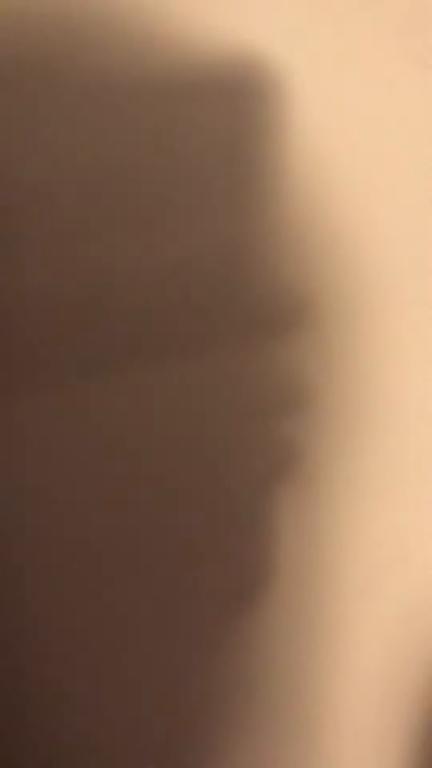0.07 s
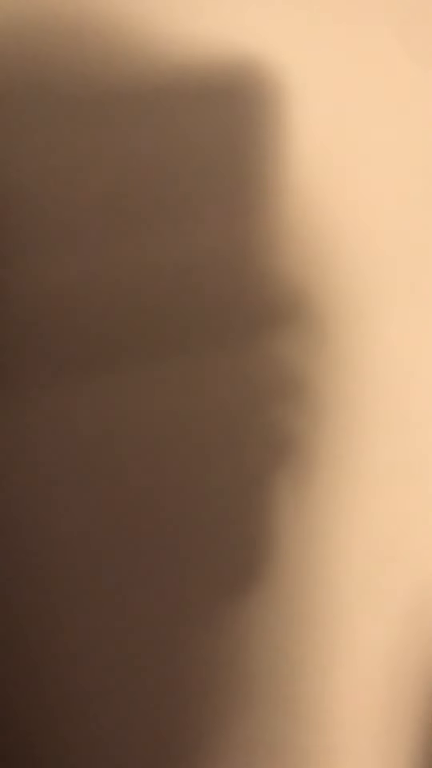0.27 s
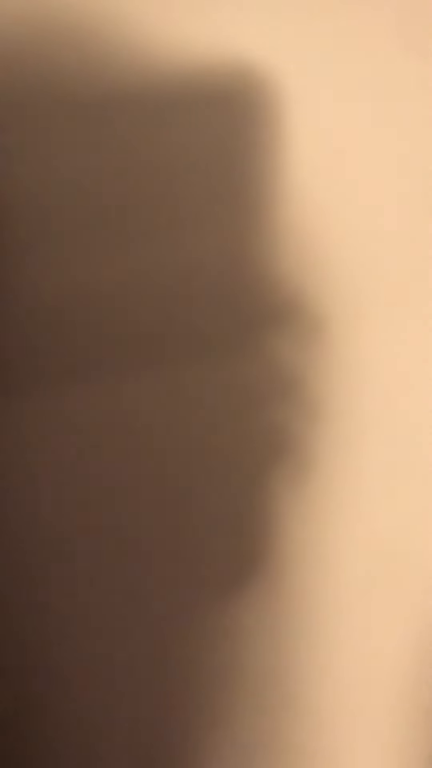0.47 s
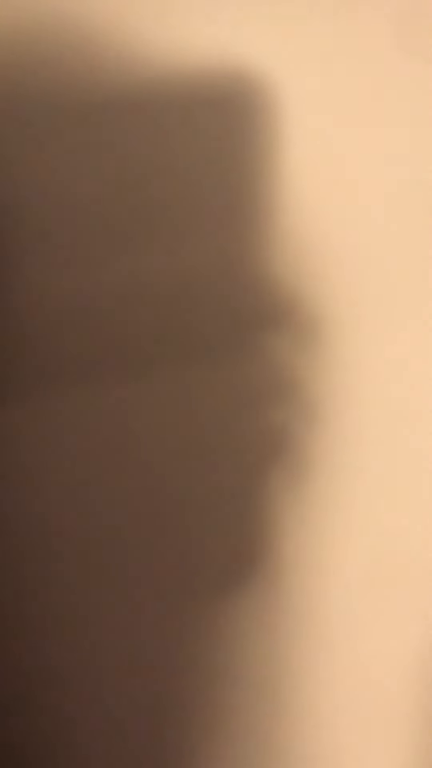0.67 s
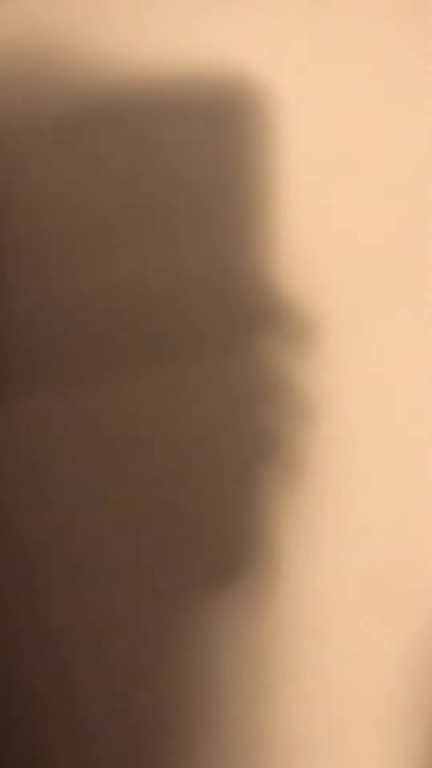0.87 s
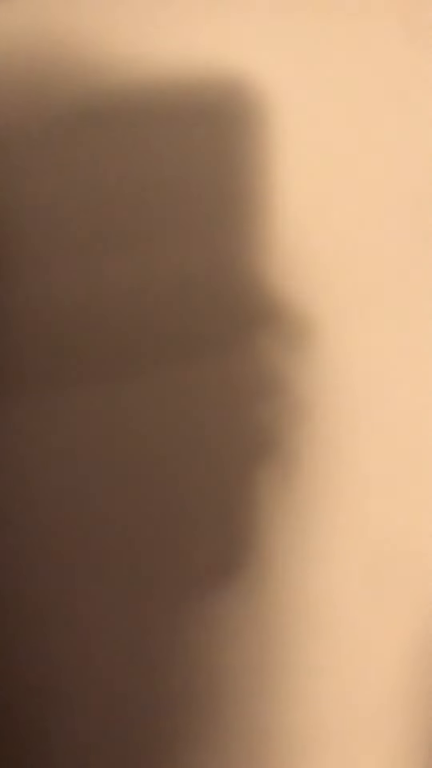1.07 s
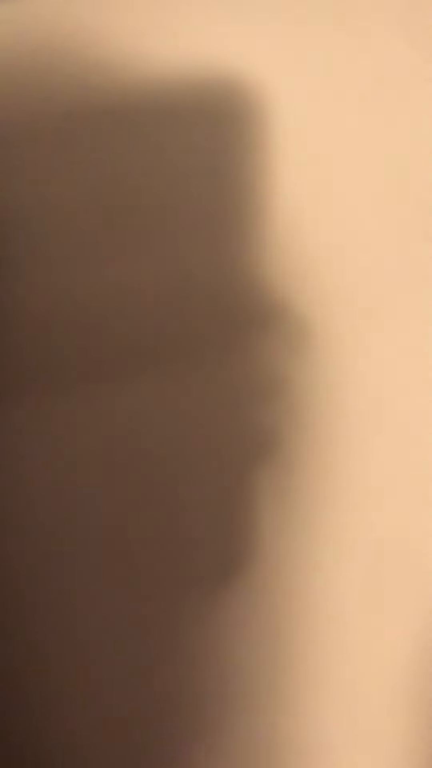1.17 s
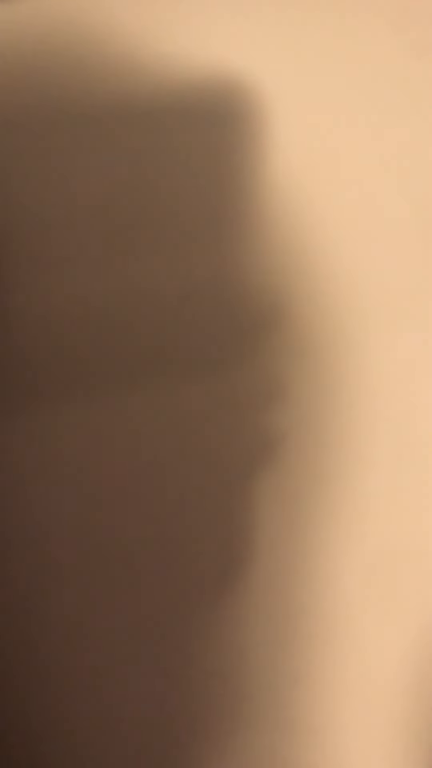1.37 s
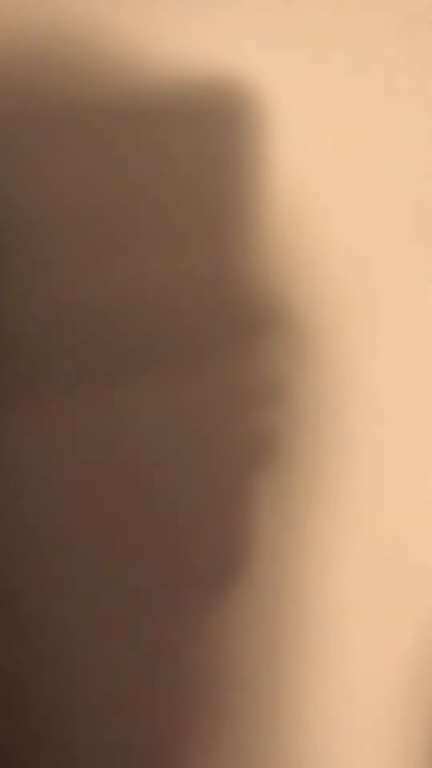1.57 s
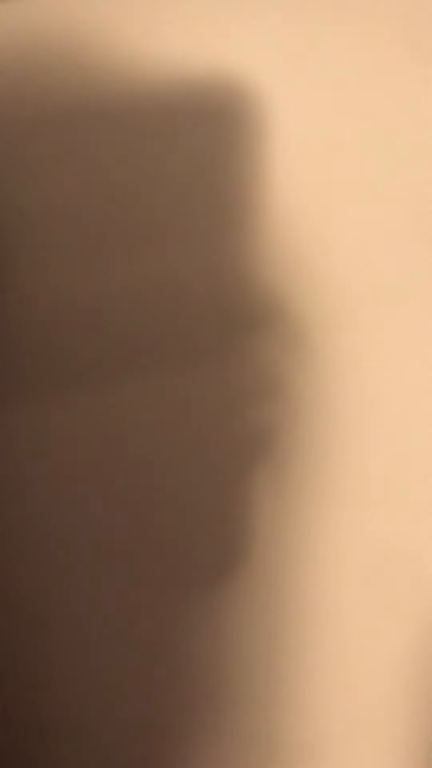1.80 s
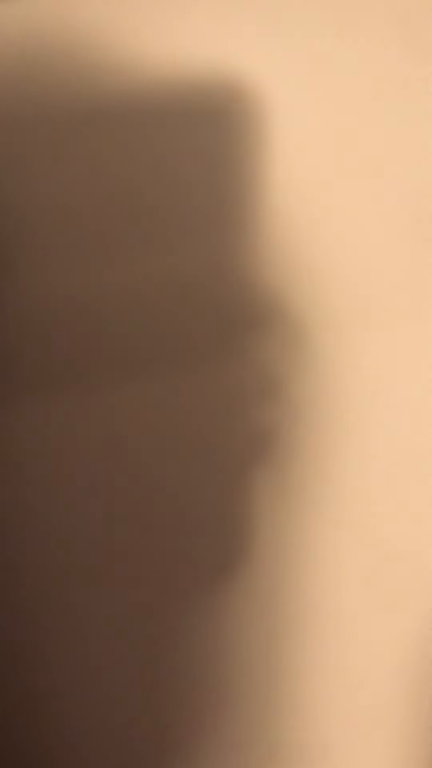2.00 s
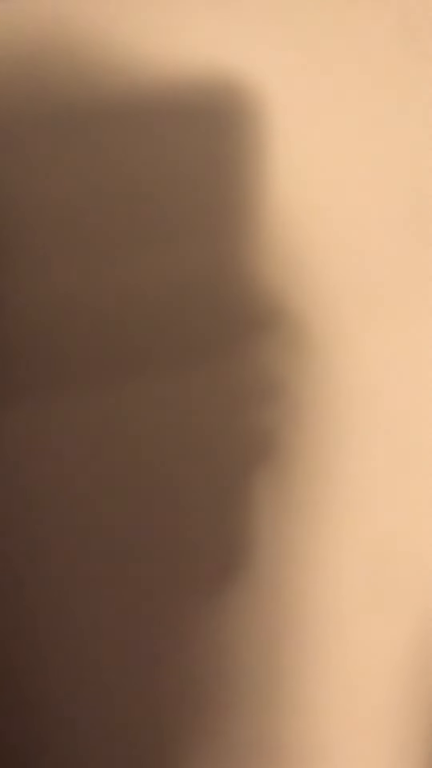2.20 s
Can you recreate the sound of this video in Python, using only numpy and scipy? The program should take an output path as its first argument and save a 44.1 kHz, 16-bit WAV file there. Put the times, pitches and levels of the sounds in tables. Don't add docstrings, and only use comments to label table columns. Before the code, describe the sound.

Small magnets clack sharply at about 0.25 seconds as a stack is set down, and a piece bounces on the table top in lighter taps until 0.5. Near quiet follows, with a faint tick at 1.15 and soft finger rustle. Around 1.53 to 1.6 a very loud, rapid cluster of bright steel snaps and a scrape bursts out, then barely audible ticks, in a quiet room with short echo, low hum and hiss.

```python
import sys
import numpy as np
from scipy import signal
from scipy.fft import rfft, irfft
from scipy.io import wavfile
from scipy.ndimage import uniform_filter1d

SR = 44100
rng = np.random.default_rng(int(sys.argv[2]) if len(sys.argv) > 2 else 0)


def nominal_scale(level):
    x = np.asarray(level, float) / 20
    return 10 ** x


def dump_mix(stems):
    frames = np.atleast_2d(stems).T
    limited = np.clip(frames, -1, 1)
    pcm = np.round(limited * 32767).astype(np.int16)
    wavfile.write(sys.argv[1], SR, pcm)


N = 99048


def level(x, db):
    return x * nominal_scale(db) / np.sqrt(np.mean(x ** 2))


def unit_energy(x):
    return x / np.sqrt(np.sum(x ** 2))


def fade(t, t60):
    return np.exp(-np.log(1000) * t / t60)


def ring(x, hz, t60):
    radius, angle = fade(1 / SR, t60), 2 * np.pi * hz / SR
    return signal.lfilter([0, radius * np.sin(angle)], [1, -2 * radius * np.cos(angle), radius ** 2], x)


def band(x, lo_hz, hi_hz):
    limits = [lo_hz, min(hi_hz, .45 * SR)]
    return signal.sosfilt(signal.butter(2, limits, "bandpass", fs=SR, output="sos"), x)


def even(x):
    spectrum = rfft(x, 2 * len(x))
    return irfft(spectrum / np.abs(spectrum))[:len(x)]


def add(out, start, sound):
    i = int(start * SR)
    out[i:i + len(sound)] += sound[:max(N - i, 0)]


def seconds(length):
    return np.arange(length) / SR


def walk(rate):
    hold = int(SR / rate)
    return uniform_filter1d(np.repeat(rng.standard_normal(N // hold + 1), hold), hold)[:N]


def curve(points):
    return np.interp(seconds(N), *np.array(points).T)


# pitch in Hz, level in dB per Hz.
HISS = [(25, -28), (45, -10.5), (85, -9.5), (200, -14.5), (420, -22), (1140, -28), (5000, -34.5),
        (16000, -39)]
# pitch in Hz, level in dB, t60 in seconds.
HUM = [(59.8, -70, 0.48), (122, -75.5, 0.082)]


def floor():
    hz = np.arange(N // 2 + 1) * SR / N + 1
    table = np.array(HISS)
    tilt_db = np.interp(np.log(hz), np.log(table[:, 0]), table[:, 1])
    hiss = irfft(rfft(rng.standard_normal(N)) * nominal_scale(tilt_db), N)
    hum = sum(level(ring(rng.standard_normal(N), f, t60), db) for f, db, t60 in HUM)
    return level(hiss * nominal_scale(.7 * walk(rate=20)), -68) + hum


# pitch in Hz, t60 in seconds, level in dB.
ECHO = [(150, 0.17, -32.5), (389, 0.25, -27), (921.3, 0.21, -29.5), (2100, 0.29, -39.5), (4030, 0.13, -36),
        (6500, 0.15, -38.5), (12600, 0.048, -36)]


def room(x):
    t = seconds(SR // 2)
    tail = 0
    for hz, t60, db in ECHO:
        tail = tail + nominal_scale(db) * fade(t, t60) * band(rng.standard_normal(len(t)), hz / 1.87, hz * 1.544)
    return signal.fftconvolve(x, tail * np.clip(t / 0.0013, 0, 1))[:N]


# start in seconds, level in dB, pitch in Hz, t60 in seconds.
BOOMS = [(0.079, -48.5, 910, .04), (.243, -28.5, 586, 0.16), (1.172, -41.5, 378, .15),
         (1.29, -54, 590, 0.11), (1.37, -53, 622, 0.14), (1.399, -57, 372, .1), (1.443, -47, 1410, 0.059),
         (1.47, -43, 600, 0.04), (1.545, -29, 357.6, 0.1), (1.565, -28, 584, 0.054), (1.98, -50, 920, 0.07),
         (2.14, -63, 637, .2), (2.226, -47, 700, 0.073)]


def hollow():
    out, t = np.zeros(N), seconds(SR // 3)
    rise = 1 - np.exp(-t / 0.0084)
    for start, db, hz, t60 in BOOMS:
        add(out, start, nominal_scale(db) * fade(t, t60) * rise * np.sin(2 * np.pi * hz * t))
    return out


# time in seconds, level in dB.
BRUSHING = [(0, -87), (.18, -88), (.235, -75), (.3, -94.5), (1.079, -94.5), (1.13, -69.5), (1.199, -86.5),
            (1.27, -76), (1.329, -69.5), (1.39, -74.5), (1.42, -74), (1.47, -67.5), (1.53, -54.5),
            (1.62, -78), (1.901, -87.5), (1.96, -80.5), (2.05, -83.5), (2.246, -69.5)]
# pitch in Hz, width in Hz, level in dB.
BRUSHED_RINGS = [(4200, 180, -3.5), (6200, 2400, -3), (9600, 670, -10.5), (11800, 1400, -8),
                 (14300, 3000, -8.5)]


def rustle():
    out, brush_db = np.zeros(N), curve(BRUSHING)
    for hz, width, db in BRUSHED_RINGS:
        grain = rng.standard_normal(N) * rng.random(N) ** 5
        patchy = nominal_scale(brush_db + 4 * walk(rate=55))
        out += level(band(grain, hz - width / 2, hz + width / 2), db) * patchy
    return out


def body(strong, field, count=260):
    f = np.array(field)
    low, high = np.sqrt(f[0, 0]), np.sqrt(f[-1, 0])
    place = (np.arange(count) + rng.random(count)) / count
    hz = (low + (high - low) * place) ** 2
    db, t60 = [np.interp(np.log(hz), np.log(f[:, 0]), column) for column in f.T[1:]]
    rows = np.vstack([strong, np.array([hz, db, t60]).T])
    t = seconds(SR // 4)
    sines = np.sin(2 * np.pi * rows[:, :1] * t)
    return rows[:, 0], nominal_scale(rows[:, 1:2]) * fade(t, rows[:, 2:]) * sines


def strike(modes, treble_from_hz, treble_db, bass_db):
    hz, sines = modes
    share, side = rng.standard_normal((len(hz), 2)).T
    treble = treble_db / (1 + (treble_from_hz / hz) ** 9)
    bass = bass_db * (hz < 750)
    return (nominal_scale(2.2 * share + treble + bass) * np.sign(side)) @ sines


# pitch in Hz, level in dB, t60 in seconds.
TABLE_MODES = [(75, -5, .08), (137, -11, .18), (270, -8, .1), (595, -3, .07), (688, -5, .06),
               (1087, -6, .05), (1545, -4, .045), (1860, -4, .045), (2572, -2, .04), (2885, -4, .04),
               (3175, -2, .04), (3395, -4, .035), (3960, -3, .025), (4300, -6, .018)]
# pitch in Hz, level in dB, t60 in seconds.
TABLE_LESSER = [(205.2, -16.5, 0.095), (700, -13, 0.095), (1830, -4.5, 0.028), (2950, -4.5, 0.028),
                (4270, -8.5, 0.019), (4940, -18, 0.0067), (6955, -21.5, 0.015), (10490, -38.5, 0.005),
                (15514, -42, 0.016)]


def table_top():
    return body(TABLE_MODES, TABLE_LESSER)


# pitch in Hz, level in dB, t60 in seconds.
STACK_MODES = [(137, -17, .15), (270, -10, .07), (377, -11, .08), (595, 0, .07), (930, -8, .03),
               (1100, -7, .03), (1670, -4, .03), (2590, -11, .025), (3800, -5, .022), (4050, -11, .018),
               (6970, -12, .028), (9600, -20, .015), (11200, -18, .018), (14200, -22, .012)]
# pitch in Hz, level in dB, t60 in seconds.
STACK_LESSER = [(210.4, -19, 0.0057), (700, -8.5, 0.022), (1782, -6.5, 0.013), (3132, -36, 0.082),
                (4200, -29.5, 0.02), (4960, -38, 0.0097), (6860, -21, 0.022), (11000, -32.5, 0.016)]


def magnet_stack():
    return body(STACK_MODES, STACK_LESSER)


# time in seconds, level in dB.
SLIDING = [(0, -76), (.15, -85.5), (.23, -63.5), (0.299, -51.5), (.6, -87.5), (1.09, -82.5), (1.14, -62.5),
           (1.2, -95), (1.259, -63), (1.34, -59), (1.4, -69), (1.501, -46), (1.574, -29.5), (1.62, -87),
           (1.75, -73), (1.9, -83), (1.989, -60), (2.048, -80), (2.131, -69.5), (2.246, -74)]


def slide(stack):
    grains_per_s, scatter_db, grip_t60_s = 900, 2.2, .07
    out = np.zeros(N)
    moving = nominal_scale(curve(SLIDING) + 2.5 * walk(rate=32)) / 2
    for _ in range(4):
        when, side, size = rng.random((N, 3)).T
        slips = (when < grains_per_s / SR) * np.sign(side - .5)
        grains = slips * nominal_scale(-scatter_db * np.log(1 - size))
        grains = level(grains * nominal_scale(6 * walk(rate=25)), 0) * moving
        spot = strike(stack, treble_from_hz=3000, treble_db=-4, bass_db=3)
        spot = unit_energy(spot * fade(seconds(len(spot)), grip_t60_s))
        out += signal.fftconvolve(grains, spot)[:N] + nominal_scale(-18) * band(grains, 2500, 16000)
    return out


# start in seconds, peak level in dB, centre pitch in Hz, length in milliseconds.
SHORT_TICKS = [(.2565, -34, 10000, 1.9), (.3277, -15.5, 12700, 0.69), (.4228, -14.5, 2100, 9.8),
               (.4925, -14.5, 2800, 2.5), (1.1552, -37, 1406, 3.9), (1.13, -63, 1306, 10),
               (2.121, -51.5, 907, 5.6), (.244, -21.5, 3600, 5.7), (.345, -29, 11500, 5.2),
               (.369, -29, 11400, 2.2), (0.3774, -33, 12000, 1), (.382, -36, 11000, 2),
               (.393, -33, 11460, 5.5), (.4195, -36, 9070, 1.4), (0.4221, -40, 12380, 1.3),
               (.456, -66, 12000, 1.5), (0.4658, -37, 11410, 1.2), (0.4918, -36, 12200, 1.1),
               (.5045, -47, 11000, 1.3), (.511, -60, 11500, 1.3), (.528, -59, 12100, 1.5),
               (.536, -53, 11500, 1.5), (1.232, -62, 12950, 1.5), (1.3124, -52, 11000, 2.8),
               (1.3337, -50, 5800, 4), (1.3612, -56, 11000, 1.5), (1.416, -56, 10500, 2),
               (1.46, -43.5, 8450, 3.1), (1.478, -47, 11500, 3), (1.735, -65, 8500, 1.8),
               (1.7874, -52.5, 5140, 3.8), (1.7908, -70, 10000, 1.4), (1.8393, -57.5, 8530, 1.8),
               (1.847, -60, 13450, 1.9), (1.908, -65, 9520, 2.9), (1.959, -60.5, 6520, 8),
               (1.968, -62, 10050, 3.5), (2.011, -63, 4400, 3.4), (2.095, -61, 7940, 2.6),
               (2.2254, -62, 10500, 3.1), (2.241, -61, 8970, 2.6), (0.077, -54.5, 1550, 5)]


def ticks():
    out, t = np.zeros(N), seconds(SR // 30)
    spread = 1.2
    for start, db, hz, length_ms in SHORT_TICKS:
        scratch = rng.standard_normal(len(t)) + 2 * (t == 0)
        sound = band(scratch * np.exp(-t * 1000 / length_ms), hz / spread, hz * spread)
        add(out, start, nominal_scale(db) * sound / np.abs(sound).max())
    return out


def hits(events, modes, treble_from_hz, buzz_db):
    out, t = np.zeros(N), seconds(SR // 8)
    for start, db, treble_db, bass_db, contact_ms in events:
        gain = nominal_scale(db + 27)
        rattle, noise, rough = rng.standard_normal((3, len(t)))
        touch = (t == 0) * 2 / contact_ms
        push = unit_energy(rattle * np.exp(-t * 1000 / contact_ms)) + touch
        push = even(push) * np.exp(-t * 250 / contact_ms)
        spot = strike(modes, treble_from_hz, treble_db, bass_db)
        add(out, start, gain * unit_energy(signal.fftconvolve(push, spot)))
        buzz = band(noise * rough * fade(t, 0.12), 5200, 13000)
        add(out, start, gain * nominal_scale(buzz_db + treble_db) * unit_energy(buzz))
    return out


# start in seconds, level in dB, treble in dB, bass in dB, contact in milliseconds.
STACK_KNOCKS = [(.002, -63.5, -18, 10, 20), (.243, -19, -0.5, 1.5, 2.9), (.2555, -36, -4, -4, 4.9),
                (.2642, -23, 0, -6, 2.5), (1.1552, -35, 3, -6, 3.56), (1.285, -52, -9.5, 8, 4.4),
                (1.361, -48.5, -7.5, 2.5, 2.4), (1.418, -57, 5.5, -3, 16), (1.444, -49.5, 1.5, -14, 2),
                (1.464, -45, 4.5, 5.5, 3.4), (1.51, -47.5, 4, -2, 20), (1.543, -26.5, 1.5, -11.5, 5.5),
                (1.553, -30.5, 9, -14, 12), (1.5625, -30, 4.5, -8.5, 5.4), (1.5685, -31, 19.5, -18, 8.6),
                (1.579, -25.5, 3.5, -17, 4.1), (1.591, -35, -3, -9.5, 3.5), (1.601, -44.5, -13, 19, 3),
                (1.64, -50, -18, 6, 2.6), (1.98, -76, -15, 26, 1.7), (2.225, -56, 0, 3.5, 2)]


def knocks(stack):
    return hits(STACK_KNOCKS, stack, treble_from_hz=3000, buzz_db=-31.5)


# start in seconds, level in dB, treble in dB, bass in dB, contact in milliseconds.
TABLE_BOUNCES = [(.328, -11.5, 5, -5.5, 1.7), (.3777, -19, 7.5, -4.5, 1.36),
                 (.4205, -30.5, -11, -15.5, 0.72), (.423, -23.5, 1.5, -1, 2.6),
                 (.466, -28.5, -6, 0.5, 3.56), (.4925, -27.5, 5.5, -6.5, 5.1),
                 (.5045, -31.5, -13.5, -3.5, 3), (.516, -30.5, 0, -7, 4.2), (1.332, -51.5, -7, -2.5, 7.1),
                 (1.727, -57.5, 2, -5, 7.2), (1.788, -59, 9, -13, 5.1), (2.008, -61.5, 6, -5, 5),
                 (2.092, -57.5, -7, 1, 8)]


def bounces(table):
    return hits(TABLE_BOUNCES, table, treble_from_hz=4500, buzz_db=-27)


# start in seconds, peak level in dB, ring pitch in Hz, upper ring level in dB.
MAGNET_SNAPS = [(.243, -18, 9500, 3), (.2647, -9, 8600, 3), (.2652, -10, 8600, 4), (.619, -56, 13000, 0),
                (1.5314, -.5, 6600, -11), (1.534, -16, 9300, -6), (1.541, -22, 7200, -10),
                (1.5478, -6, 6700, -12), (1.5578, -2.5, 7000, -7), (1.566, -18, 6600, -8),
                (1.5717, -7, 6900, -9), (1.577, -16, 6800, -6), (1.582, -17, 6800, -6)]


def snaps():
    out, t = np.zeros(N), seconds(SR // 10)
    for start, db, hz, upper_db in MAGNET_SNAPS:
        rebounds = rng.standard_normal(len(t)) * rng.random(len(t)) ** 4
        chatter = nominal_scale(-18.5) * rebounds * fade(t, .03)
        push = chatter - (t == 0)
        sound = ring(push, hz, 0.0015)
        sound = sound + nominal_scale(upper_db) * ring(push, 11000, 0.0019)
        sound = sound + nominal_scale(-10.5) * band(push, 3500, 15000)
        sound = band(sound, 3000, 14000) + nominal_scale(13.5) * band(chatter, 6500, 8700)
        add(out, start, -nominal_scale(db) * sound / np.abs(sound).max())
    return out


def scene():
    table, stack = table_top(), magnet_stack()
    near = bounces(table) + knocks(stack) + snaps() + slide(stack)
    near = near + hollow() + ticks() + rustle()
    return (band(near + room(near), 70, 21000) + floor())[None]


def band_limit(x):
    return signal.sosfilt(signal.butter(12, 16980, fs=SR, output="sos"), x)


def record(dry):
    clipped = np.clip(dry, -.86, .86)
    top_cut = signal.ellip(6, .3, 50, 16300, fs=SR, output="sos")
    return band_limit(signal.sosfilt(top_cut, clipped))


dry = scene()
out = record(dry)
dump_mix(out)
```